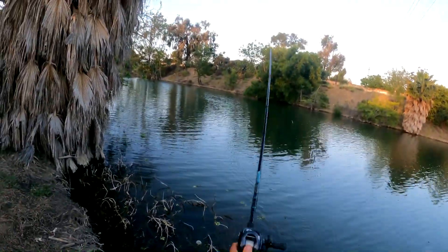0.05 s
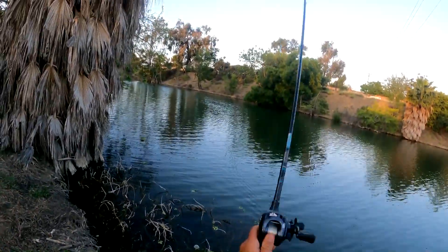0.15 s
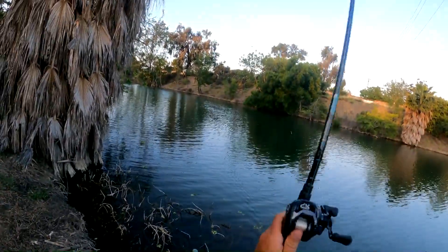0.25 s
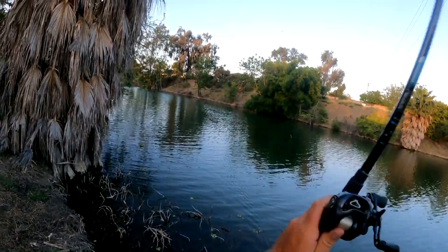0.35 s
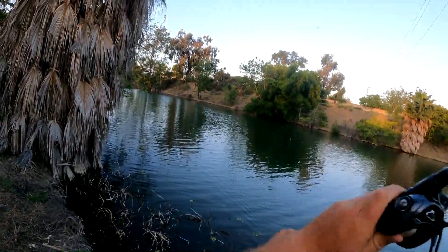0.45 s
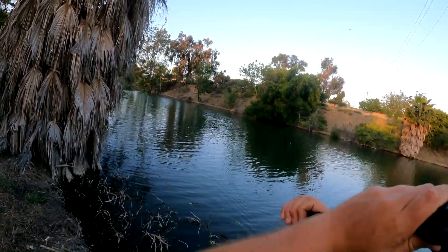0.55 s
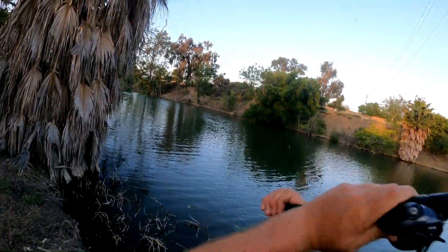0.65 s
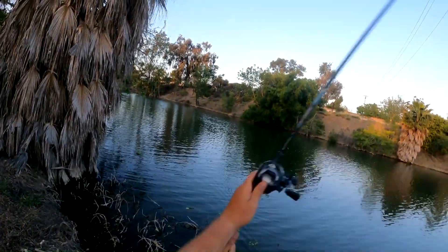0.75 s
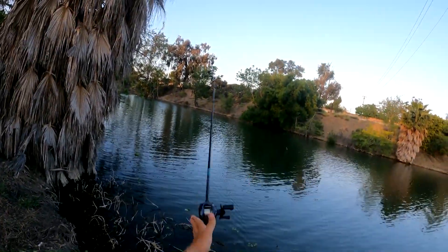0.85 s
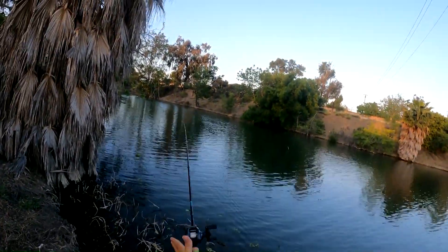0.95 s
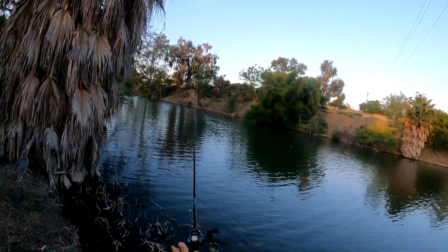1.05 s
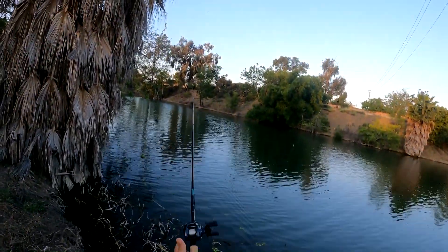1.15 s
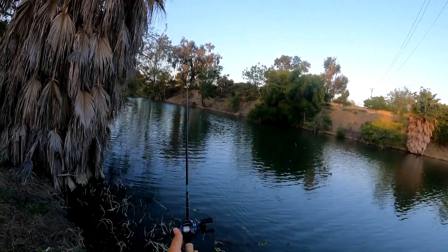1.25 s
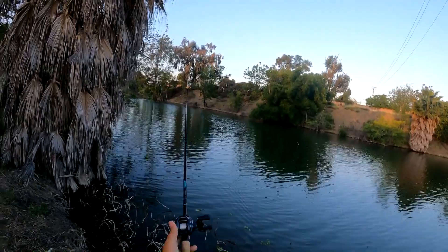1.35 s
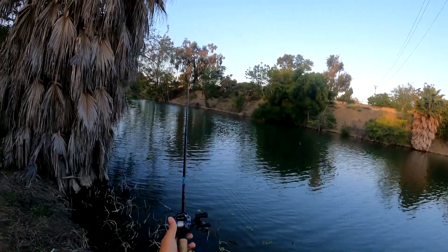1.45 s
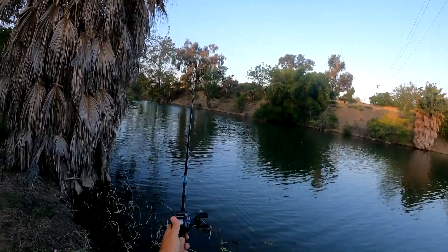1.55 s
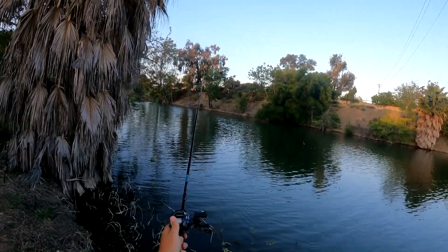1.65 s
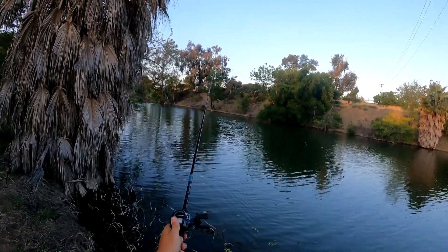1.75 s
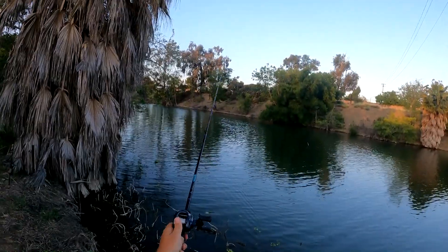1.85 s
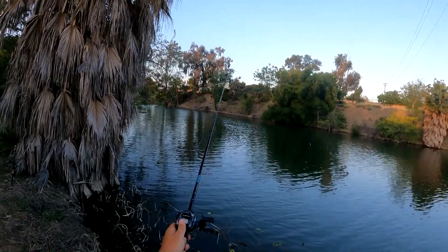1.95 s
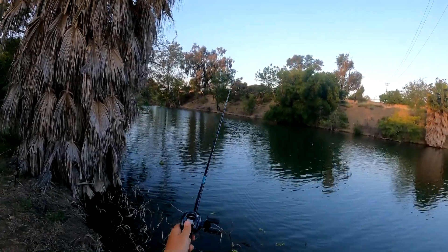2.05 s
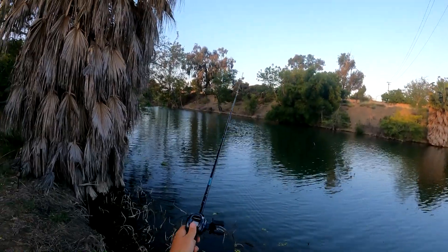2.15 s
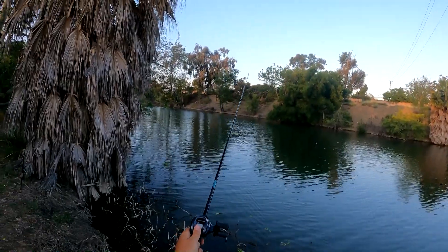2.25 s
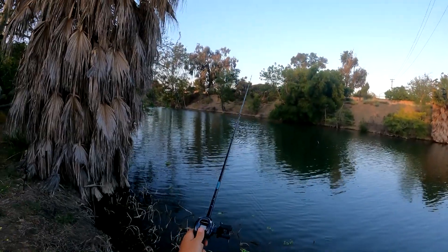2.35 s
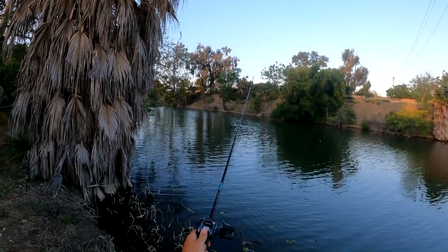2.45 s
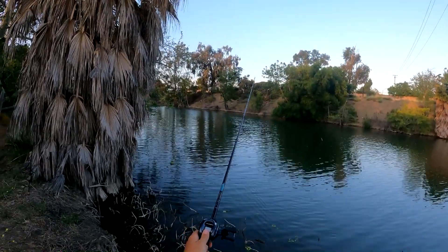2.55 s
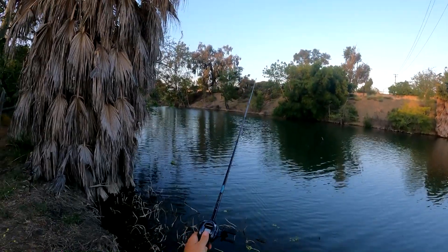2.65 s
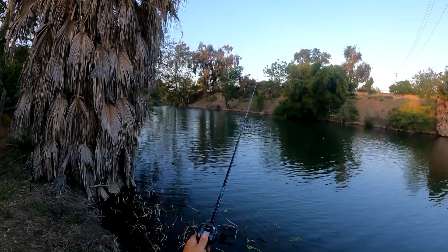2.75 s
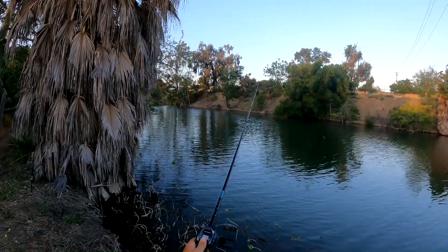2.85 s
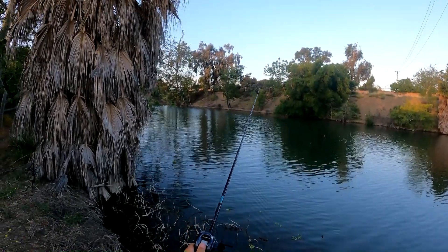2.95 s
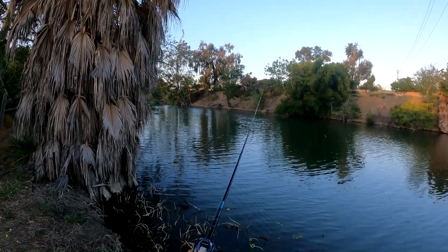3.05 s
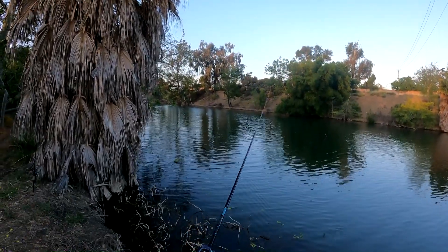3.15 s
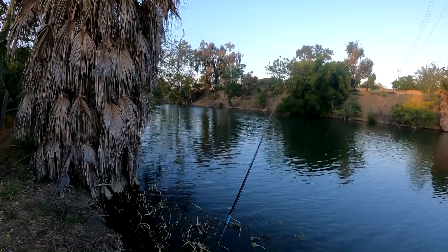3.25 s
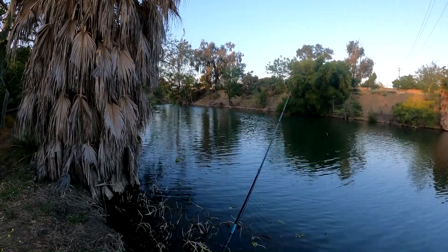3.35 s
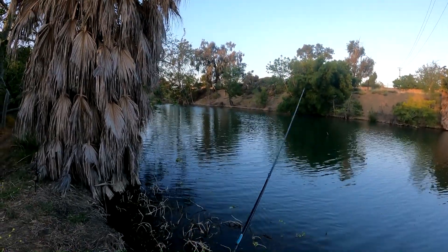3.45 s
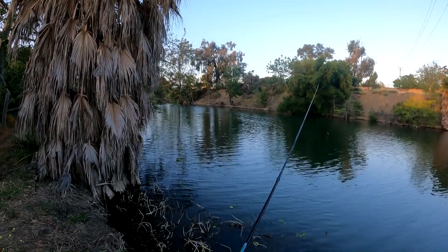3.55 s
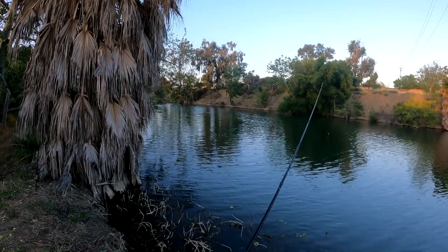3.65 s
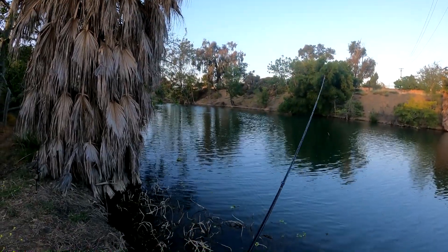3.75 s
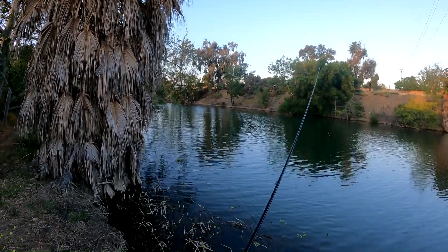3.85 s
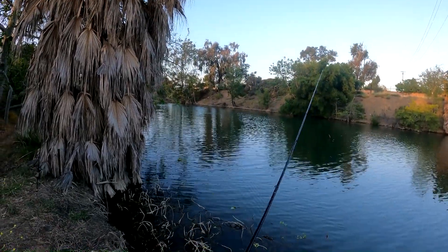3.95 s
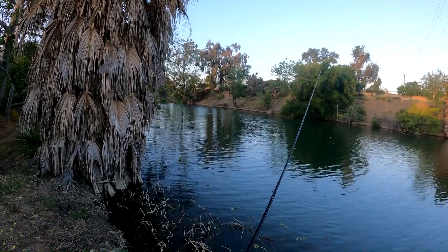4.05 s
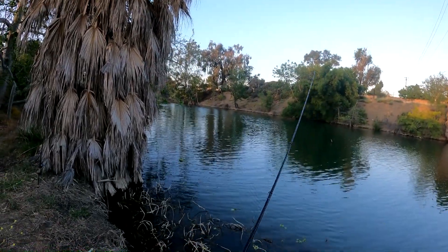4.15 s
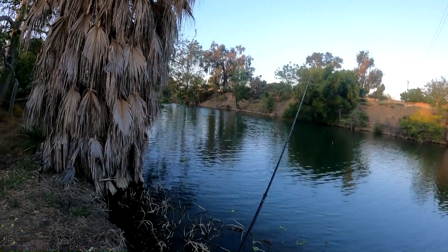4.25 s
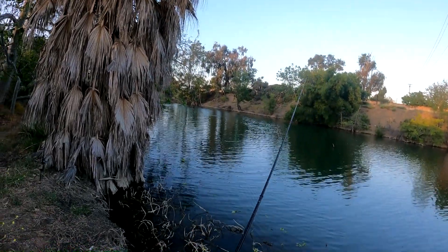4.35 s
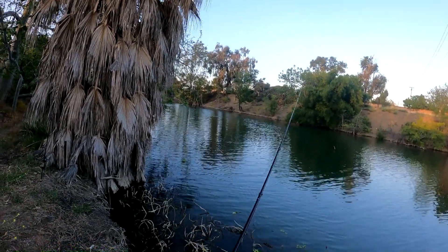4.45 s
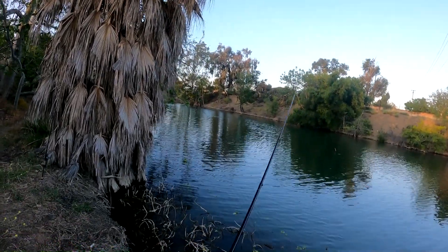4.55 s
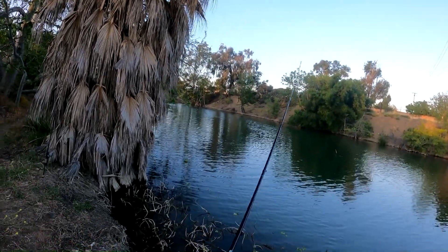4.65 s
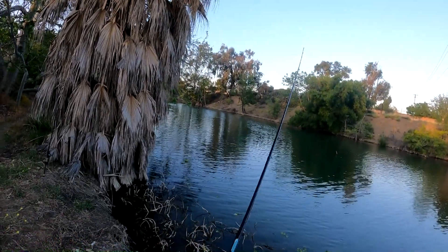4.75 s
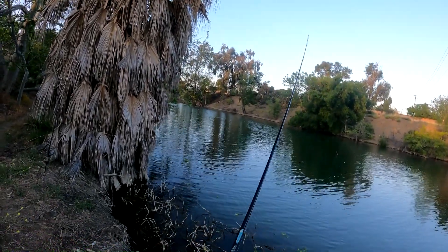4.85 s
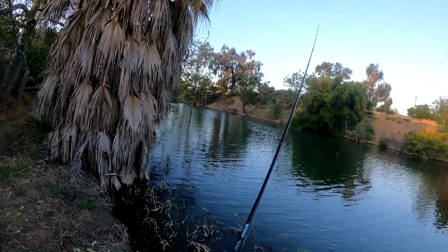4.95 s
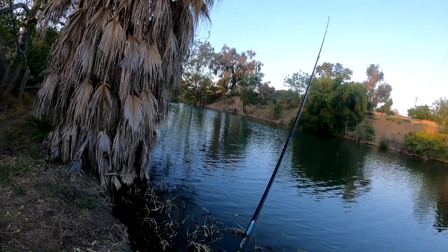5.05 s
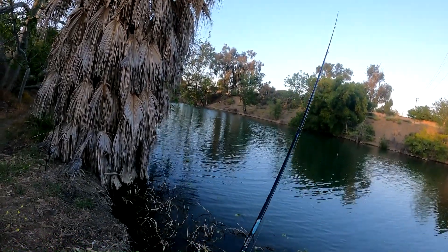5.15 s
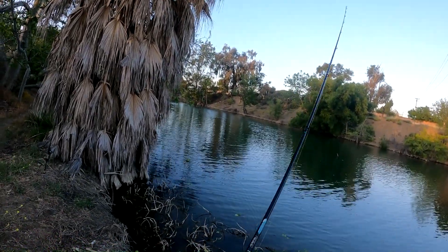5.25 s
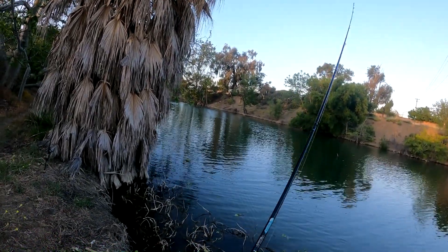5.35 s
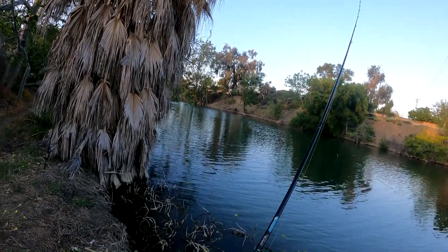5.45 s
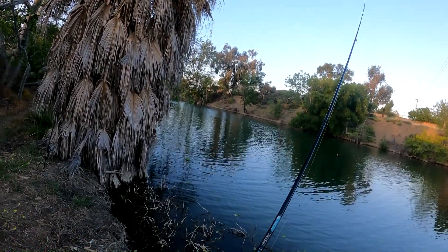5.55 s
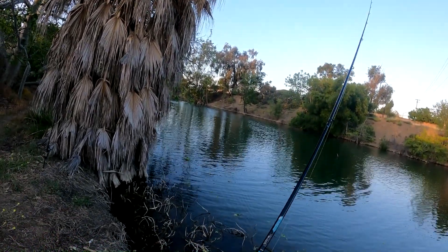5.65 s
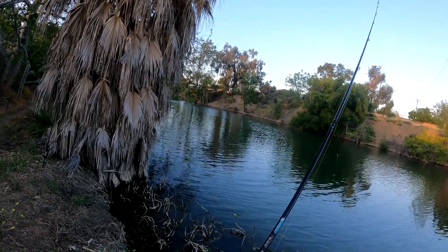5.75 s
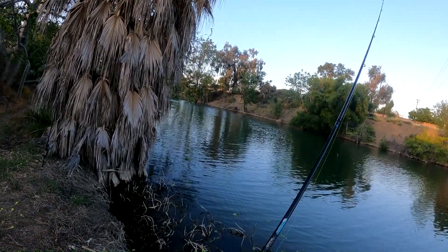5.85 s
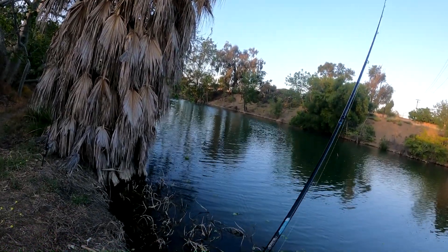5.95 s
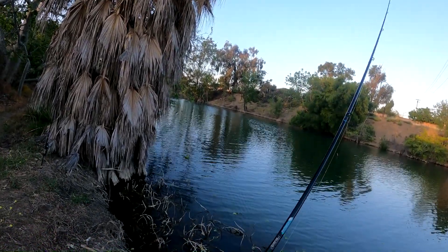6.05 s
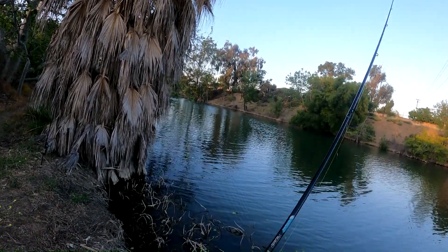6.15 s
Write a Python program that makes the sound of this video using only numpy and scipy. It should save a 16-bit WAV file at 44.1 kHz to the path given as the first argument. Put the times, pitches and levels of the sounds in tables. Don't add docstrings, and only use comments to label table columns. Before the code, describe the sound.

A fishing rod whips with a hard knock, line hisses out over a falling spool whine, flutters slack, then the reel clutch clicks sharply by a rumbling pond.

```python
import sys
import numpy as np
from scipy import signal
from scipy.fft import rfft, irfft, next_fast_len
from scipy.io import wavfile

SR = 44100
rng = np.random.default_rng(int(sys.argv[2]) if len(sys.argv) > 2 else 0)


def gain_from_decibels(decibels):
    exponent = np.asarray(decibels, float) / 20
    return 10 ** exponent


def inscribe(sig):
    pcm = np.round(np.clip(np.atleast_2d(sig).T, -1, 1) * 32767)
    wavfile.write(sys.argv[1], SR, pcm.astype(np.int16))


N = 273023
FFT_SIZE = next_fast_len(N)


def rms_one(x):
    return x / np.sqrt(np.mean(x ** 2) + 1e-20)


def in_time(rows, fade=0):
    s, *columns = np.transpose(rows)
    t = np.arange(N) / SR
    gate = np.clip(np.minimum(t - s[0], s[-1] - t) / (fade + 1e-9) + 1, 0, 1)
    return [np.interp(t, s, c) for c in columns] + [gate]


def plateau(start_s, end_s, fade_s):
    t = np.arange(N) / SR
    coming = (t - start_s) / min(fade_s, .12)
    going = (end_s - t) / fade_s
    return np.clip(np.minimum(coming, going) + 1, 0, 1) ** 2


def at_hz(points, hz):
    point_hz, value = np.transpose(points)
    return np.interp(np.log(hz), np.log(point_hz), value)


def drift(hz, size=N):
    r = np.exp(-2 * np.pi * hz / SR)
    run_in = size // 6
    noise = rng.standard_normal(size + run_in)
    return rms_one(signal.lfilter([1], [1, -2 * r, r * r], noise)[run_in:])


def resonate(x, hz, width_hz):
    r = np.exp(-np.pi * width_hz / SR)
    poles = [1, -2 * r * np.cos(2 * np.pi * hz / SR), r * r]
    return signal.lfilter([(1 - r * r) / 2, 0, (r * r - 1) / 2], poles, x)


def motor_tone(hz, width_hz):
    once = resonate(rng.standard_normal(N), hz, width_hz)
    return rms_one(resonate(once, hz, 2 * width_hz))


def ring(clicks, hz, t60):
    r, w = gain_from_decibels(-60 / (t60 * SR)), 2 * np.pi * hz / SR
    return signal.lfilter([0, np.sin(w)], [1, -2 * r * np.cos(w), r * r], clicks + 1e-18)


def to_sound(spectra):
    return irfft(spectra, FFT_SIZE)[:, :N]


# (frequency [Hz], likeness [0..1])
LIKENESS = [(30, 1), (125, 1), (250, 0.98), (500, 0.94), (1000, 0.93), (3000, 0.77), (8000, 0.77),
            (12000, 0.45)]


def stereo_noise(colour):
    hz = np.maximum(np.fft.rfftfreq(FFT_SIZE, 1 / SR), 1)
    edge = (hz > colour[0][0]) * (hz < colour[-1][0])
    mid, side = rfft(rng.standard_normal((2, FFT_SIZE))) * gain_from_decibels(at_hz(colour, hz)) * edge
    alike = np.clip(at_hz(LIKENESS, hz), 0, 1)
    pair = np.sqrt(1 + alike) * mid + np.sqrt(1 - alike) * side * [[1], [-1]]
    return hz, pair / np.sqrt(np.mean(to_sound(pair) ** 2))


def whine(gate, hz, level_db, width_hz, steady):
    blur = drift(width_hz, size=56000) + 1j * drift(width_hz, size=56000)
    blur = 1.25 * blur / np.sqrt(np.abs(blur) + .01)
    on, out = np.flatnonzero(gate > 0)[:len(blur)], np.zeros(N)
    turn = np.exp(2j * np.pi * np.cumsum((hz * np.ones(N))[on]) / SR)
    tone = np.real((steady + (1 - steady) * blur[:len(on)]) * turn)
    out[on] = gate[on] * gain_from_decibels(level_db[on]) * tone
    return out


# (time [s], pitch [Hz], effort [dB])
FAST_SPOOL = [(.87, 1501, -12), (.93, 1466, 0), (.98, 1443, -5.5), (1.04, 1381, -1), (1.1, 1340, 2),
              (1.17, 1296, 1), (1.23, 1263, 1), (1.285, 1246, 0)]
SLOW_SPOOL = [(1.3, 1181, -4), (1.345, 1125, -3), (1.375, 1090, 2), (1.44, 1081, -2), (1.52, 1073, -2),
              (1.65, 968, -2.5), (1.72, 938, -5)]
# (frequency [Hz], level [dB])
WHINE_RESPONSE = [(940, -42), (1150, -46), (1330, -39.5), (1500, -38.5), (2100, -36.5), (2300, -38.5),
                  (2550, -37), (2720, -51), (2880, -37.5), (3800, -62)]
# blur width [Hz], then share of clean tone
WHINE_WIDTH_HZ = [46, 160, 200]
WHINE_STEADY = [.7, .55, .3]


def spool(stage):
    hz, effort_db, gate = in_time(stage, fade=0.023)
    out = 0
    for k, width_hz, steady in zip((1, 2, 3), WHINE_WIDTH_HZ, WHINE_STEADY):
        level_db = effort_db + at_hz(WHINE_RESPONSE, k * hz)
        out = out + whine(gate, k * hz, level_db, width_hz, steady)
    return out


# (time [s], centre [Hz], level [dB])
RUB = [(1.27, 4820, -44), (1.32, 4640, -42), (1.38, 4500, -41.5), (1.45, 4390, -41), (1.55, 4320, -41),
       (1.62, 4030, -42), (1.72, 3880, -46)]
RUB_WIDTH_HZ, CORE_OFFSET_HZ, CORE_DB = 280, 120.3, -5


def brake_rub():
    hz, level_db, gate = in_time(RUB, fade=.025)
    out = whine(gate, hz, level_db, RUB_WIDTH_HZ, steady=0)
    for side in (-1, 1):
        out = out + whine(gate, hz + side * CORE_OFFSET_HZ, level_db + CORE_DB, 90, steady=0.17)
    return out


# (peak time [s], rise [s], fall [s], pitch [Hz], width [Hz], level [dB])
PLATE = [(.84, 0.01, 0.18, 7280, 220, -44), (1.19, 0.41, 0.17, 7620, 221, -41.5),
         (1.38, .1, 0.11, 7500, 200, -49), (1.57, 0.1, 0.11, 7380, 220, -45),
         (1.85, 0.09, 0.17, 7500, 220, -64), (2.2, 0.33, 0.24, 7500, 200, -65.5)]
GUIDE = [(.99, .06, 0.063, 3960, 110, -37.5), (1.06, 0.029, .04, 4170, 100, -48),
         (1.61, 0.08, .1, 3020, 150, -42), (1.19, 0.05, 0.13, 3830, 150, -40),
         (0.79, .05, .08, 5700, 130, -53), (1.2, 0.089, 0.12, 2400, 260, -39),
         (1.16, .1, .12, 6000, 280, -42), (.9, 0.046, .07, 2100, 200, -39), (2.0, .2, .35, 3900, 180, -58)]
SING_EDGE_DB = -9


def singing(swells, steady):
    out = 0
    for s, rise_s, fall_s, hz, width_hz, peak_db in swells:
        swell = [(s - rise_s, SING_EDGE_DB), (s, 0), (s + fall_s, SING_EDGE_DB)]
        level_db, gate = in_time(swell, fade=.02)
        out = out + whine(gate, hz, peak_db + level_db, width_hz, steady)
    return out


# (frequency [Hz], width [Hz], level [dB])
HOUSING = [(3980, 450, -27), (9800, 1000, -14), (7500, 300, -9)]


def through_housing(x):
    return rms_one(x + sum(gain_from_decibels(level_db - 9) * resonate(x, hz, width_hz) for hz, width_hz, level_db in HOUSING))


# (time [s], level [dB])
HISS = [(.69, -62), (.75, -58), (.78, -42.5), (.81, -45), (.83, -32), (.88, -35), (1.58, -35.5),
        (1.72, -41), (1.74, -57)]
# (frequency [Hz], density [dB per Hz])
HISS_COLOUR = [(530, -71), (900, -8.5), (2790, 3), (3370, -0.5), (4330, 3.5), (6570, -3), (7490, -4),
               (8230, -8), (10400, -12), (13900, -26.5), (15500, -45)]
HISS_BRIGHT_DB = 7.5
# (start [s], end [s], fade [s], level [dB], brightness [dB])
BRUSHES = [
    (0.0, 0.07, 0.075, -64.5, 1),
    (0.154, 0.525, 0.31, -61.5, 1),
    (1.738, 1.763, 0.35, -45.5, 5),
    (1.97, 2.397, .06, -62.5, 3),
]


def line_hiss():
    level_db, gate = in_time(HISS, fade=0.012)
    hz, pair = stereo_noise(HISS_COLOUR)
    top = np.clip(np.log2(hz / 7000), 0, 1)
    dull, bright = to_sound(pair * (1 - top)), to_sound(pair * top)
    out = gate * gain_from_decibels(level_db) * through_housing(dull + gain_from_decibels(HISS_BRIGHT_DB) * bright)
    for start_s, end_s, fade_s, brush_db, bright_db in BRUSHES:
        brush = through_housing(dull + gain_from_decibels(bright_db) * bright)
        out = out + plateau(start_s, end_s, fade_s) * gain_from_decibels(brush_db) * brush
    return gain_from_decibels(drift(24)) * out


# (time [s], level [dB])
WHIP = [(0.71, -48), (0.762, -50), (.815, -34), (0.832, -37), (0.848, -37), (0.95, -47)]
# (frequency [Hz], density [dB per Hz])
WHIP_COLOUR = [(250, -4), (600, -2), (1200, -2), (2000, -1), (3500, -5), (7000, -21)]


def whip():
    level_db, gate = in_time(WHIP, fade=0.04)
    return gate * gain_from_decibels(level_db + 1.4 * drift(60)) * to_sound(stereo_noise(WHIP_COLOUR)[1])


# (time [s], peak [dB])
FLUTTER = [(1.7453, -47.3), (1.7505, -43.8), (1.7609, -46), (1.767, -43), (1.7738, -43), (1.7812, -46.7),
           (1.79, -46), (1.7956, -46), (1.8013, -54), (1.8065, -44.4), (1.82, -41), (1.827, -42),
           (1.8374, -42), (1.8422, -44), (1.8496, -43.4), (1.8578, -47.7), (1.8655, -48.5), (1.8702, -49.7),
           (1.8771, -45), (1.8866, -51.6), (1.892, -45.1), (1.8984, -47.6), (1.909, -50.3), (1.9146, -48.0),
           (1.9289, -47.8), (1.9342, -48.9), (1.9415, -48.9), (1.9459, -48), (1.9508, -48), (1.96, -48),
           (1.9679, -46), (1.9732, -49.9), (1.979, -47.4), (1.9848, -49), (1.99, -50.3), (1.9948, -55),
           (2.0011, -50.8), (2.0064, -54), (2.0183, -49.2), (2.0285, -50.1), (2.0343, -49), (2.0406, -49.9),
           (2.0493, -52.1), (2.0549, -47), (2.0597, -50.8), (2.0662, -49)]
LATE_FLUTTER = [(2.0844, -46), (2.0911, -55.1), (2.1015, -52.4), (2.1092, -62), (2.1166, -50),
                (2.1225, -46), (2.1333, -60), (2.1427, -60), (2.1533, -52), (2.1636, -56.3), (2.1695, -50),
                (2.1771, -46), (2.1837, -50), (2.1972, -48), (2.2038, -57.1), (2.2144, -60.1),
                (2.2203, -55.7), (2.23, -51), (2.2356, -52.6), (2.2417, -52.7), (2.2505, -49.8),
                (2.2587, -49), (2.2715, -52.7), (2.2779, -58.5), (2.288, -48), (2.2977, -55.8),
                (2.3083, -53.2), (2.3174, -50), (2.3327, -52), (2.347, -57.1), (2.3515, -54.6),
                (2.3559, -52), (2.3695, -54.5), (2.3756, -50), (2.3835, -50), (2.3946, -54.6),
                (2.4052, -50.5), (2.4175, -66), (2.4223, -64.5), (2.4338, -50.5), (2.4472, -66.3),
                (2.457, -59.5), (2.4632, -58), (2.4766, -67), (2.4904, -61), (2.4999, -69), (2.5071, -68)]
# (frequency [Hz], density [dB per Hz])
FLUTTER_COLOUR = [(2400, -6), (3000, -5), (3730, -12), (4230, -4.5), (5020, -13), (5950, -6), (7500, -12),
                  (8230, -13), (14500, -37)]
SLAP_GAIN_DB, SLAP_S = 1, 0.0086


def flutter():
    slaps, rows = np.zeros(N), np.array(FLUTTER + LATE_FLUTTER)
    slaps[(rows[:, 0] * SR).astype(int)] = gain_from_decibels(rows[:, 1] + SLAP_GAIN_DB)
    puff = np.hanning(round(SLAP_S * SR))
    return signal.fftconvolve(slaps, puff, "same") * to_sound(stereo_noise(FLUTTER_COLOUR)[1])


# (time [s], peak [dB], softness cut [Hz])
KNOCKS = [(.7012, -25, 1500), (0.8175, -22, 2600), (0.8256, -29, 2400), (.8341, -9.5, 8000),
          (.8353, -17, 5000)]
# (frequency [Hz], level [dB], t60 [s])
BLANK = [(1250, -8, .003), (1750, 0, .004), (2600, -4, .0025), (3500, -3, .0025), (4500, -3, .0025),
         (5500, -4, .0025)]


def knocks():
    out, click = np.zeros(N), np.eye(1, 1024)[0]
    body = sum((-1) ** k * gain_from_decibels(db) * ring(click, hz, t60) for k, (hz, db, t60) in enumerate(BLANK))
    for s, peak_db, cut_hz in KNOCKS:
        knock = signal.sosfilt(signal.butter(2, cut_hz, fs=SR, output="sos"), body)
        start = round(s * SR)
        out[start:start + 1024] += gain_from_decibels(peak_db) * knock / np.abs(knock).max()
    return out


CLICK_S, CLICK_DB = 3.7451, -19.5
# (time after the snap [s], level [dB])
REBOUNDS = [(0, -6), (.0004, 2.5), (.0011, -7), (.0017, -7), (.0029, -8), (.0048, -17), (.0075, -25.5)]
# (frequency [Hz], level [dB], t60 [s])
REEL = [(2200, -15, 0.019), (2490, -2.5, 0.008), (2840, -11, 0.0081), (3800, 8.5, 0.0044),
        (4500, -13.5, 0.012), (5300, 0, 0.0065), (6260, 2, 0.0066), (6700, 2, 0.0034),
        (7700, -20.5, 0.0067), (9000, -18, 0.0057), (10800, -25, 0.0046), (12700, -16, 0.0043)]
# low edge, high edge [Hz]
CONTACT_BAND_HZ = [2200, 11000]


def clutch():
    after_s, rebound_db = np.transpose(REBOUNDS)
    at, out = [round((CLICK_S + s) * SR) for s in after_s], np.zeros(N)
    for hz, level_db, t60 in REEL:
        clicks = np.zeros(N)
        clicks[at] = gain_from_decibels(CLICK_DB + level_db + rebound_db + rng.normal(0, 1.5, len(at)))
        out += ring(clicks, hz, t60)
    return signal.sosfilt(signal.butter(5, CONTACT_BAND_HZ, "band", fs=SR, output="sos"), out)


def bank_echo(x):
    dull = signal.sosfilt(signal.butter(1, 6000, fs=SR, output="sos"), x)
    lags = (rng.uniform(0.001, .014, (2, 6)) * SR).astype(int)
    return np.array([sum(gain_from_decibels(-12 - 1400 * lag / SR) * np.roll(dull, lag) for lag in side) for side in lags])


# (time [s], peak [dB], brightest [Hz])
TICKS = [(0.6372, -53, 7000), (0.654, -43, 7000), (0.6954, -38.5, 9000), (0.727, -39, 6500),
         (0.8172, -23, 8500), (0.821, -27, 7500), (0.8263, -33, 5500), (0.663, -50, 6000),
         (2.639, -52, 9000), (2.687, -58, 11000), (2.777, -55, 11000), (2.795, -57, 11000),
         (2.815, -53, 8500), (3.323, -56, 7000), (3.62, -58, 10000), (5.17, -58, 8000), (5.45, -60, 8000),
         (3.005, -35, 5800), (3.0186, -43, 2580), (3.5013, -49, 6000), (3.5367, -42, 3380),
         (3.5967, -46, 4670), (3.888, -41.5, 3220), (3.894, -44, 5600), (3.9144, -47, 8000),
         (4.348, -43.5, 6200), (4.883, -55, 6900), (5.0686, -48.5, 5600), (5.3326, -48, 4500),
         (5.702, -56, 7000)]
TEETH = [(3.6945, -32, 4200), (3.701, -38, 7040), (3.7045, -43, 7000), (3.7068, -45, 6530),
         (3.719, -39, 4200), (3.7224, -34, 2600), (3.726, -27, 7500), (3.7292, -31, 9500),
         (3.7342, -23.5, 3950), (3.738, -28, 3200), (3.7408, -34, 4500), (3.77, -43, 6000),
         (3.7715, -43, 5000), (3.776, -44, 7000), (3.7854, -33, 3870), (3.79, -41, 3500)]
# (low edge [Hz], high edge [Hz])
TICK_BANDS_HZ = [(1600, 2900), (3200, 5700), (6400, 9000), (9800, 12000)]
TICK_BAND_TRIM_DB = [4, -0.5, -4, -12]
TICK_SLOPE_DB_PER_OCTAVE, TICK_T60_S = 7, 0.011


def ticks():
    out, t, contacts = np.zeros((2, N)), np.arange(2048) / SR, TICKS + TEETH
    bands = [signal.butter(3, edges, "band", fs=SR, output="sos") for edges in TICK_BANDS_HZ]
    centres = np.sqrt(np.prod(TICK_BANDS_HZ, axis=1))
    decay = gain_from_decibels(-60 * t / TICK_T60_S) + 0.07 * gain_from_decibels(-60 * t / 0.03)
    for s, peak_db, hz in contacts:
        burst = (rng.standard_normal(2048) + 4.6 * (t == 0)) * decay
        parts = [signal.sosfilt(band, burst) for band in bands]
        bands_db = peak_db - TICK_SLOPE_DB_PER_OCTAVE * np.log2(centres / hz) ** 2 + TICK_BAND_TRIM_DB
        tick = sum(gain_from_decibels(db) * part / np.abs(part).max() for db, part in zip(bands_db, parts))
        start, pan_db = round(s * SR), rng.normal(0, 1)
        out[:, start:start + 2048] += tick * gain_from_decibels([[pan_db], [-pan_db]])
    return out


# (frequency [Hz], density [dB per Hz])
RUSTLE_COLOUR = [(3000, -21.5), (5000, -5.5), (7000, -2.5), (7600, -0.5), (8200, -6), (10200, -13),
                 (11200, -12.5), (14000, -37)]
WISPS_FROM_S = 2.5
WISP_BELOW_TICK_DB, WISP_TOP_DB, WISP_REST_DB = 27.5, -65, -84
WISP_RISE_S, WISP_FALL_DB_PER_S = 0.022, 150


def rustle():
    t, level_db = np.arange(N) / SR, WISP_REST_DB + 3.8 * drift(3.3)
    for s, peak_db, hz in TICKS + TEETH:
        top_db = min(peak_db - WISP_BELOW_TICK_DB, WISP_TOP_DB)
        below_db = np.where(t < s, 20 * (s - t) / WISP_RISE_S, WISP_FALL_DB_PER_S * (t - s))
        level_db = np.maximum(level_db, top_db - below_db)
    grit = to_sound(stereo_noise(RUSTLE_COLOUR)[1])
    return plateau(WISPS_FROM_S, N / SR, .05) * gain_from_decibels(level_db + 2 * drift(70)) * grit


# (start [s], end [s], fade [s], level [dB])
MURMURS = [
    (1.77, 2.056, 1, -48.5),
    (3.05, 3.704, 0.42, -57),
    (5.298, 5.506, 0.26, -58),
]
# (frequency [Hz], density [dB per Hz])
MURMUR_COLOUR = [(900, -20), (1400, 4.5), (2000, 4), (2600, -4), (3200, -17), (6000, -26.5)]


def murmur():
    swell = sum(gain_from_decibels(db) * plateau(start_s, end_s, fade_s) for start_s, end_s, fade_s, db in MURMURS)
    return swell * gain_from_decibels(1.2 * drift(8.6)) * to_sound(stereo_noise(MURMUR_COLOUR)[1])


# (time [s], gust [dB], traffic nearness [dB])
RUMBLE = [(0, 3.5, -0.5), (.35, -3.5, -2.5), (.85, 4, -1), (1.3, -3.5, -1), (1.9, -1, -2), (2.7, 2, -1.5),
          (3.0, 3, 0.5), (3.9, 0, 2), (4.5, -0.5, 3), (5.6, 3, 4.5), (6.19, 4, 0)]
RUMBLE_REGIONS_HZ = [70, 260, 650, 1500]
REGION_FOLLOWS = [(0.77, 0.017), (0, 0.17), (0.32, 0.92)]
# (frequency [Hz], density [dB per Hz])
RUMBLE_COLOUR = [(12, -31.5), (20, -9), (49, 1.5), (91, -1.5), (175, -12), (224, -15.5), (278, -18.5),
                 (309, -20.5), (363, -23.5), (411, -22), (449, -24.5), (725, -28.5), (1400, -41),
                 (1820, -69.5), (3080, -120)]
AIR_COLOUR = [(820, -0.5), (1400, 0), (2020, -3), (2400, -9), (2750, -10.5), (3320, -14.5), (3600, -14),
              (3870, -17), (5640, -22.5), (7320, -29.5), (10200, -47.5), (11200, -68), (15600, -95),
              (22000, -120)]
# (pitch [Hz], width [Hz], level [dB])
DRONES = [(56, 10, -46), (233.3, 10, -53.5), (306.5, 6.9, -57), (418, 18, -61.5), (758, 120, -69),
          (3655, 280, -76)]
RUMBLE_DB, AIR_DB, AIR_LIFT_DB, AIR_FOLLOWS = -29, -50.5, 2, 0.19


def rumble():
    hz, pair = stereo_noise(RUMBLE_COLOUR)
    gust_db, traffic_db, gate = in_time(RUMBLE)
    air_db = AIR_DB + AIR_LIFT_DB + AIR_FOLLOWS * traffic_db + 0.66 * drift(4.1)
    out = gain_from_decibels(air_db) * to_sound(stereo_noise(AIR_COLOUR)[1])
    regions = np.eye(4)
    regions[2] += regions[3]
    for region, (gusty, busy) in zip(regions, REGION_FOLLOWS):
        share = np.interp(np.log(hz), np.log(RUMBLE_REGIONS_HZ), region)
        level_db = RUMBLE_DB + gusty * gust_db + busy * traffic_db + 0.35 * drift(3.2)
        out = out + gain_from_decibels(level_db) * to_sound(pair * share)
    for drone_hz, width_hz, drone_db in DRONES:
        level_db = drone_db + traffic_db * (drone_hz > 100) + 2 * drift(1.0)
        out = out + gain_from_decibels(level_db) * motor_tone(drone_hz, width_hz)
    return out


MOTOR_START_S, MOTOR_RISE_S, MOTOR_HZ, MOTOR_DB, MOTOR_FADE_DB_PER_S = 5.4, .2, 706, -45.5, 8.5
WAVER_HZ, WAVER_PERIOD_S, WAVER_TOP_S, WAVER_DB = 34.4, .45, 5.62, -1


def far_motor():
    t = np.arange(N) / SR
    waver = np.cos(2 * np.pi * (t - WAVER_TOP_S) / WAVER_PERIOD_S)
    level_db = MOTOR_DB + WAVER_DB * waver - MOTOR_FADE_DB_PER_S * np.abs(t - WAVER_TOP_S)
    gate = plateau(MOTOR_START_S, N / SR, MOTOR_RISE_S)
    return whine(gate, MOTOR_HZ + WAVER_HZ * waver, level_db, 35, steady=0.33)


# (start [s], end [s], fade [s], pitch [Hz], width [Hz], level [dB])
HUMS = [(1.88, 3.78, 0.72, 307, 4.4, -49.5), (5.0, 6.2, 0.34, 418, 11, -54.5),
        (5.4, 5.9, 0.27, 225, 15, -49), (2, 3.65, 0.35, 142.2, 12, -44.5), (3.6, 4.6, .4, 232, 8, -50.5)]


def hums():
    return sum(gain_from_decibels(db) * plateau(start_s, end_s, fade_s) * motor_tone(hz, width_hz)
               for start_s, end_s, fade_s, hz, width_hz, db in HUMS)


CRICKET_S = [3.875, 3.915, 4.015, 4.05, 4.215, 4.25, 4.52, 4.56, 4.82, 4.855, 5.15, 5.37, 5.61, 5.645, 5.69,
             5.72]
CRICKET_HZ, CRICKET_DB, CRICKET_PULSE_S = 7600, -71, .018


def cricket():
    pulses = np.zeros(N)
    pulses[(np.array(CRICKET_S) * SR).astype(int)] = gain_from_decibels(CRICKET_DB + rng.normal(0, 2, len(CRICKET_S)))
    envelope = signal.fftconvolve(pulses, np.hanning(round(CRICKET_PULSE_S * SR)), "same")
    return envelope * np.sin(2 * np.pi * CRICKET_HZ * np.arange(N) / SR)


NEAR_LEFT_DB, NEAR_NARROWING = .45, .25


def scene():
    whining = spool(FAST_SPOOL) + spool(SLOW_SPOOL)
    rubbing = brake_rub() + singing(PLATE, steady=0) + singing(GUIDE, steady=.1)
    snap = -knocks() - clutch()
    reel = whining + rubbing + snap + bank_echo(snap + 0.25 * rubbing)
    near = reel + line_hiss() + whip() + flutter() + ticks()
    near = near + NEAR_NARROWING * (near.mean(axis=0) - near)
    near = near * gain_from_decibels([[NEAR_LEFT_DB], [-NEAR_LEFT_DB]])
    return near + rustle() + murmur() + rumble() + far_motor() + hums() + cricket()


def band_limit(x):
    return signal.sosfilt(signal.butter(12, 15620, fs=SR, output="sos"), x)


# (frequency [Hz], level [dB])
PORT_BALANCE = [(60, .7), (290, .5), (640, -.4), (1410, -.2), (3100, -.4), (5600, .2), (9500, 0),
                (15000, -.5)]
# (frequency [Hz], lag [rad])
PORT_LAG = [(30, 0), (300, .12), (700, .35), (1460, .3), (3000, .6), (5200, .35), (9500, .35), (12500, 0)]
TOP_HZ, LIMIT, CLOSE_S = 15300, .8, .0001


def record(dry):
    dry = signal.sosfiltfilt(signal.cheby2(10, 25, TOP_HZ + 400, fs=SR, output="sos"), dry)
    size = next_fast_len(N + 4096)
    hz = np.fft.rfftfreq(size, 1 / SR) + 1
    late = gain_from_decibels(at_hz(PORT_BALANCE, hz)) * np.exp(-1j * at_hz(PORT_LAG, hz))
    left = irfft(rfft(np.pad(dry[0], (0, size - N), "reflect")) * late, size)[:N]
    rounded = LIMIT * np.tanh(np.array([left, dry[1]]) / LIMIT)
    left_s = np.arange(N, 0, -1) / SR
    closing = np.sin(np.pi / 2 * np.minimum(left_s / CLOSE_S + 0.033, 1))
    return band_limit(rounded * closing)


dry = scene()
out = record(dry)
inscribe(out)
```